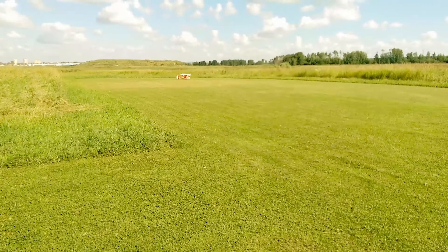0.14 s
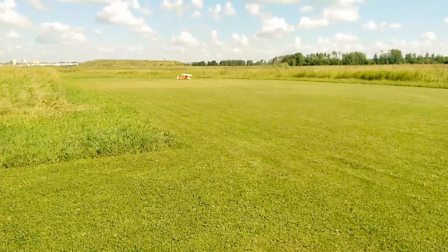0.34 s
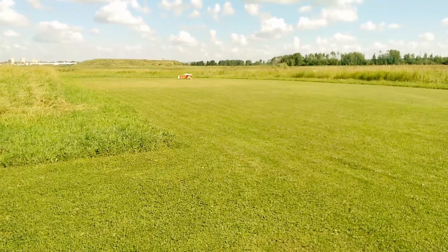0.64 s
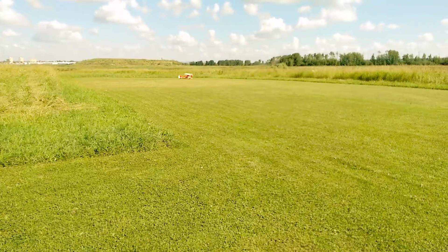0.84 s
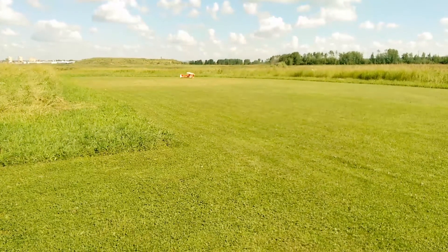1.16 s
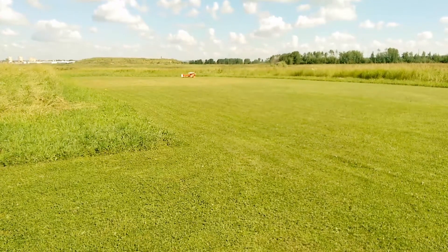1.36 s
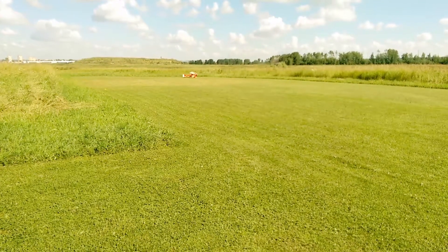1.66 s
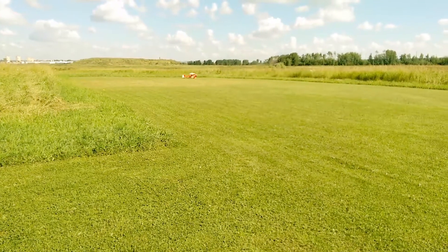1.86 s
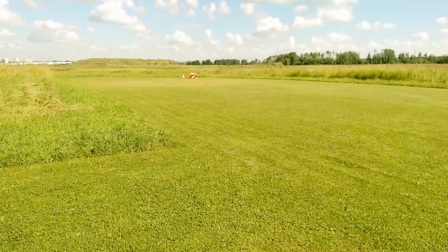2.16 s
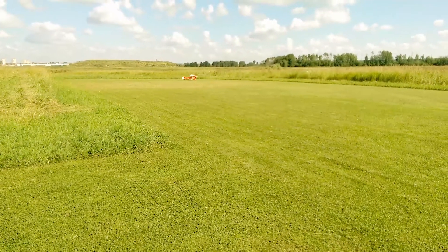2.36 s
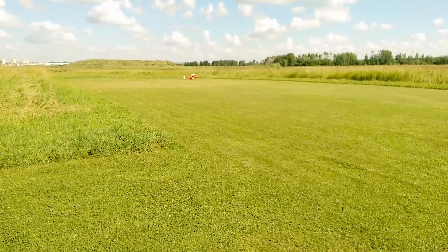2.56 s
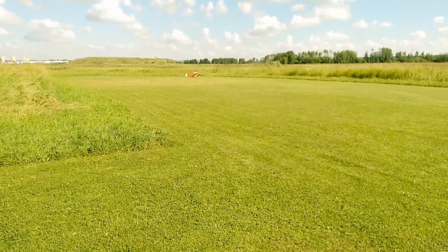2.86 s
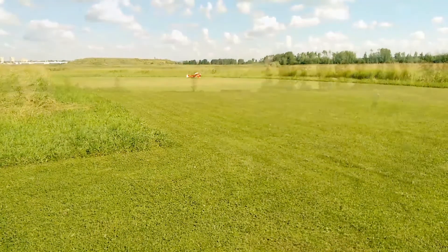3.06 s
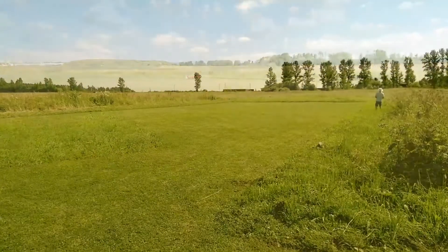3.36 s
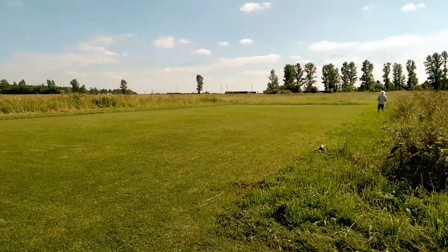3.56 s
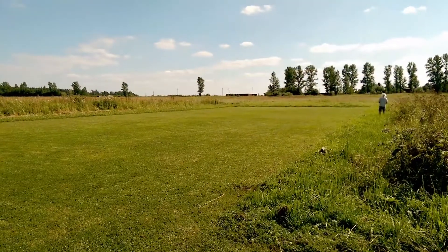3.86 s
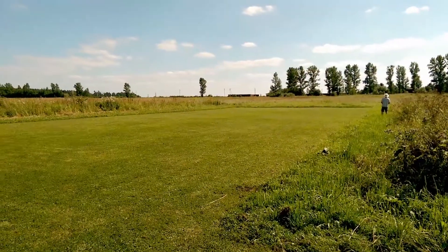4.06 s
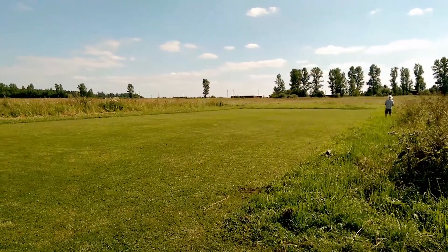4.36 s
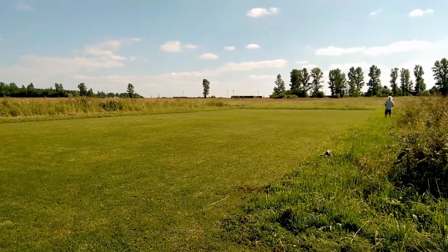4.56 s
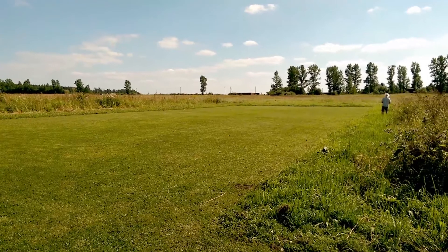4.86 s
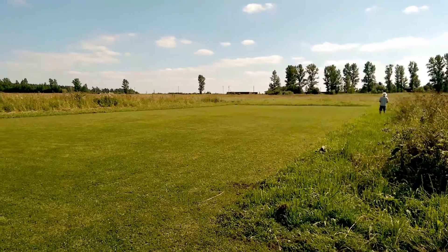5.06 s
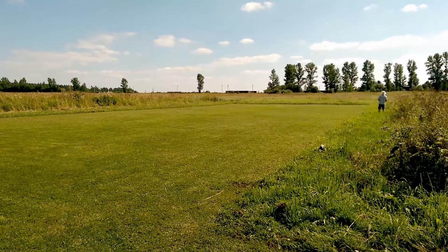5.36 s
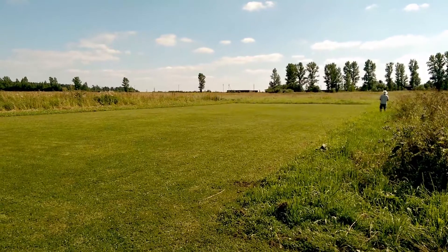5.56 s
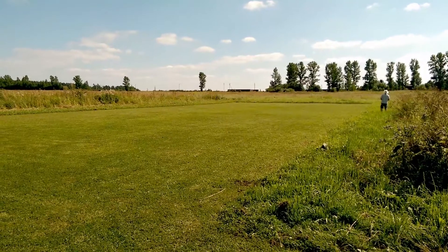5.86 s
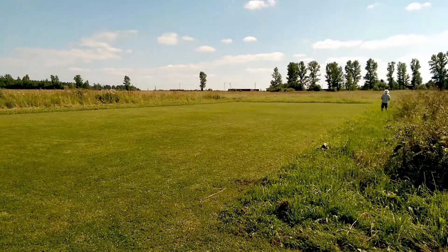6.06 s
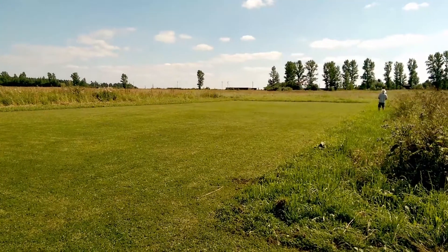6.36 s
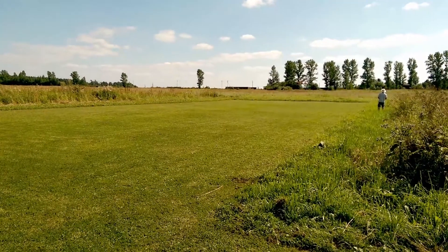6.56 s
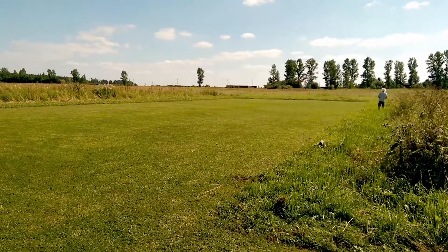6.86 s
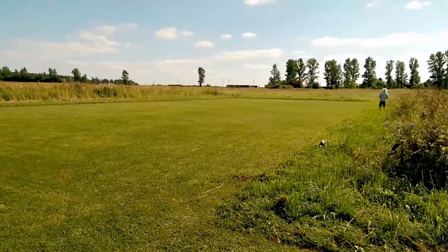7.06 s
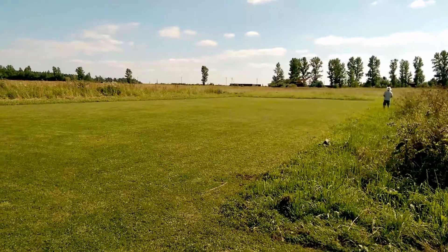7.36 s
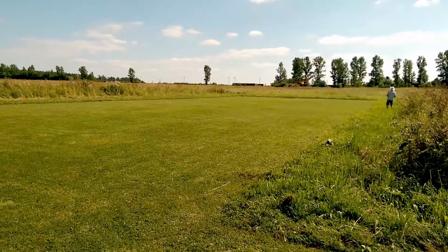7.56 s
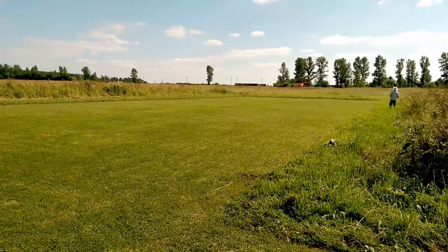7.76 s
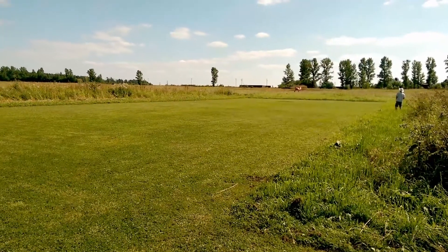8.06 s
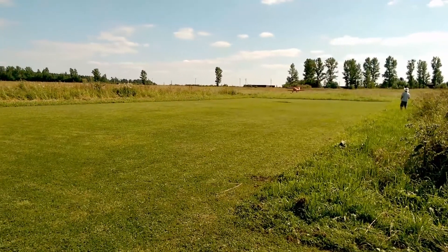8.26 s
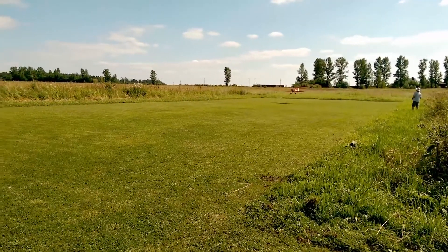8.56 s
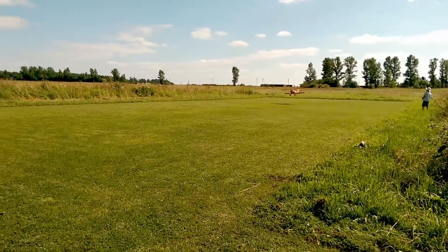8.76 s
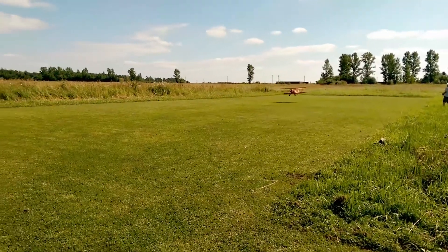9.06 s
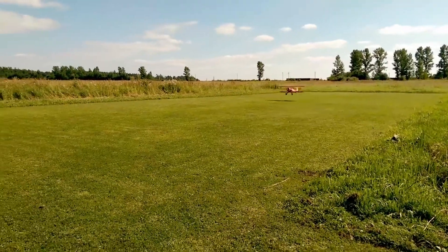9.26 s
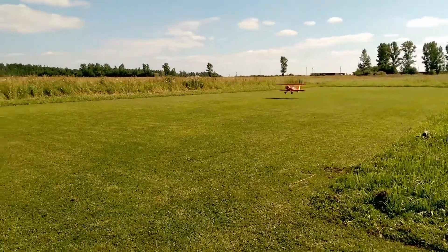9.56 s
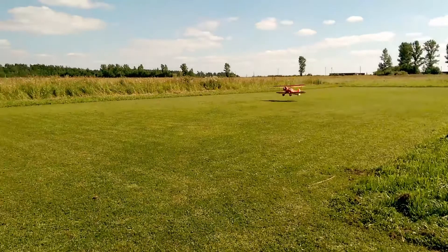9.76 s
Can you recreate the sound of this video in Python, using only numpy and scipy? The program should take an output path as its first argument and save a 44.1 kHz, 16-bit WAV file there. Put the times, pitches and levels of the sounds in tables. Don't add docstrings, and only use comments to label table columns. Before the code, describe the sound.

On an open grass field, a large model plane's multi-cylinder four-stroke engine taxis far away, dull, boomy and uneven, with low wind knocks on the right. Around three seconds it blends into a nearer view: raspy throttle bursts with metallic cracks, a high peak after six seconds, then a slow lumpy idle growing louder as it rolls up. Grasshoppers rasp faintly; open stereo microphones hiss.

```python
import sys
import numpy as np
from scipy import signal
from scipy.fft import rfft, irfft
from scipy.io import wavfile
from scipy.ndimage import uniform_filter1d

SR = 44100
rng = np.random.default_rng(int(sys.argv[2]) if len(sys.argv) > 2 else 0)


def inscribe(sig):
    pcm = np.round(np.clip(np.atleast_2d(sig).T, -1, 1) * 32767)
    wavfile.write(sys.argv[1], SR, pcm.astype(np.int16))


def ratio_of_db(decibels):
    return 10 ** (np.asarray(decibels, float) / 20)


N = 437472


def evened(x):
    return x / np.sqrt(np.mean(x ** 2) + 1e-20)


def read(points, hz):
    f, value = np.transpose(points)
    return np.interp(np.log(hz + 1), np.log(f + 1), value)


def shape(x, response):
    return irfft(rfft(x) * response(np.fft.rfftfreq(x.shape[-1], 1 / SR)), x.shape[-1])


def peaks(modes, hz):
    return np.sqrt(sum(ratio_of_db(db) ** 2 / (1 + (2 * (hz - f) / w) ** 2) ** 2 for f, w, db in modes))


def resonant_noise(modes, same):
    a, b = rng.standard_normal((2, N))
    ports = np.array([a, same * a + np.sqrt(1 - same ** 2) * b])
    return evened(shape(ports, lambda hz: peaks(modes, hz)))


def causal(response, size=4096):
    log_gain = np.log(response(abs(np.fft.fftfreq(size, 1 / SR))))
    ring = np.fft.ifft(np.exp(np.conj(signal.hilbert(log_gain)))).real
    return ring / np.linalg.norm(ring)


def blows(at, size, ring):
    return signal.oaconvolve(np.bincount(at, size, N)[:N], ring)[:N]


def bursts(at, size, decay_s):
    n = np.arange(1500)
    fall = np.exp(-n / (decay_s * SR)) * np.minimum(n / 45, 1)
    return blows(at, size, fall / np.linalg.norm(fall))


# [f/Hz, level/dB per Hz]
HISS_COLOUR = [(250, -47), (450, -3), (600, -1.5), (1140, -9.5), (3000, -16), (4500, -18), (5600, -12.5),
               (6440, -19.5), (7750, -8), (10400, -12.5), (12500, -3.5), (14100, 0.5), (15800, 0)]
# [f/Hz, level/dB]
HISS_TILT = [(400, -2), (4000, -1), (8000, -5), (12000, -13), (16000, -13)]


def hiss():
    ports = lambda hz: ratio_of_db(read(HISS_COLOUR, hz) + np.outer([.5, -.5], read(HISS_TILT, hz)))
    return ratio_of_db(-47) * evened(shape(rng.standard_normal((2, N)), ports))


# [t/s, level/dB, left minus right/dB]
WIND = [(0.0, -50.5, -14), (0.88, -53.5, -6), (1.68, -49.5, -8), (2.042, -47, -8), (2.43, -53.5, -7.5),
        (2.82, -48.5, -10), (3.12, -50.5, 1), (3.42, -53.5, -8), (4.34, -63, 0), (9.28, -56.5, -1.5),
        (9.92, -53, -2)]
# [f/Hz, level/dB per Hz]
RUMBLE = [(12, -51), (20, 3.5), (50, 1), (76, -7.5), (125, -11), (162, -13.5), (236, -3.5), (336, -28),
          (400, -29), (520, -76), (880, -120)]
# [t/s, peak level/dB, swing f/Hz, top of the rustle f/Hz]
KNOCKS = [(0.0, -20, 112, 310), (0.012, -26.5, 75, 195.6), (0.039, -26.5, 91.7, 220),
          (0.239, -31.5, 119, 201.2), (0.288, -23, 92, 320), (0.301, -25, 90, 260), (0.317, -35, 110, 200),
          (0.406, -33, 103, 200), (0.564, -31, 130, 205), (0.751, -32, 75, 200), (1.229, -35, 68.1, 202),
          (1.579, -37.5, 72.7, 202), (1.973, -27, 154.7, 566), (1.985, -26, 74.4, 300),
          (2.029, -27.5, 152, 332), (2.078, -29.5, 147, 200), (2.761, -39, 188, 198.4),
          (2.798, -36, 66.65, 200), (3.401, -38, 62.3, 200), (3.559, -41, 96, 201)]


def wind():
    rumble = evened(shape(rng.standard_normal((3, N)), lambda hz: ratio_of_db(read(RUMBLE, hz))))
    lumps = evened(shape(rng.standard_normal((2, N)), lambda hz: hz < 12))
    s, *columns = np.transpose(WIND)
    level_db, pan_db = (np.interp(np.arange(N) / SR, s, c) for c in columns)
    port_db = 1.6 * lumps + level_db + np.outer([.5, -.5], pan_db)
    out = (rumble[:2] + 1.69 * rumble[2]) * ratio_of_db(port_db)
    t = np.arange(3000) / SR
    for s, db, hz, top_hz in KNOCKS:
        rustle = evened(shape(rng.standard_normal(3000), lambda f: 1 / (1 + (f / top_hz) ** 6)))
        swing = -np.sin(2 * np.pi * hz * t) + 0.5 * rustle
        knock = ratio_of_db(db + 6.0) * swing * np.minimum(t / 0.0016, 1) * np.exp(-(t / 0.013) ** 2)
        part = out[1, round(s * SR):][:3000]
        part += signal.lfilter(*signal.butter(3, 2.5 * top_hz, fs=SR), knock)[:len(part)]
    return shape(out, lambda hz: 1 / (1 + (42 / (hz + 1)) ** 3))


# (t/s, f/Hz, level/dB, half length/s)
CHIRP = (3.055, 3250, -52, .006)


def bird():
    s, hz, db, half_s = CHIRP
    t = np.arange(N) / SR - s
    return ratio_of_db(db) * np.exp(-(t / half_s) ** 2) * np.sin(2 * np.pi * hz * t)


# [start t/s, end t/s, f/Hz, left level/dB, right level/dB]
GRASSHOPPERS = [
    (4.352, 5.579, 8930, -58, -57),
    (5.551, 7.118, 7835, -72, -53.5),
    (7.303, 9.009, 7752, -56, -53.5),
    (8.749, 9.95, 9530, -56.5, -52.5),
]
# [strokes per s, share chopped 0-1]
STROKES = [(51.5, .6), (54.3, .78), (53.6, .65), (48, .4)]


def grasshoppers():
    t, out = np.arange(N) / SR, np.zeros((2, N))
    sharpness, tiring_per_s, swell_s = 2.2, .02, .3
    for (start, end, hz, left_db, right_db), (per_s, depth) in zip(GRASSHOPPERS, STROKES):
        gate = np.clip(np.minimum((t - start) / swell_s, (end - t) / 0.011), 0, 1)
        beat = np.cos(2 * np.pi * per_s * (t - start) * (1 - tiring_per_s * (t - start)))
        scrape = 1 - depth + 1.82 * depth * np.exp(sharpness * (beat - 1))
        rasp = resonant_noise([(hz, 0.16 * hz, 0)], 0.5)
        out += rasp * gate * scrape * ratio_of_db(np.array([[left_db], [right_db]]))
    return out


# [f/Hz, width/Hz, level/dB]
VALVE = [(11300, 550, 1), (8500, 880, -5), (3900, 600, -17)]


def valve_gear(rate, hiss_db, valve, rockers):
    strong_s, over_hiss_db = valve
    crank = np.cumsum(rate) / SR
    rocker = (crank - crank[round(strong_s * SR)]) * 2 / 3
    shut = np.flatnonzero(np.diff(np.floor(rocker)) > 0)
    weak_db = -20 * (np.floor(rocker[shut + 1]) % 2)
    chance_db = 2 * np.clip(rng.standard_normal(len(shut)), -2, 1.5)
    tick_db = over_hiss_db + hiss_db[shut] + weak_db + chance_db
    taps = np.bincount(shut, np.sqrt(SR / rate[shut]) * ratio_of_db(tick_db - 9), N)
    for s, db in rockers:
        taps[round(s * SR)] += ratio_of_db(db + 13.0)
    return signal.oaconvolve(taps, causal(lambda hz: peaks(VALVE, hz)))[:N]


def propeller(rate, turns, at, crack, hiss_db, modes, alike):
    blade = np.flatnonzero(np.diff(np.floor(turns * 4 / 3)) > 0)
    chance_db = 3.5 * np.clip(rng.standard_normal(len(blade)), -2, 2)
    slap = np.sqrt(SR / rate[blade]) * ratio_of_db(chance_db)
    swish = bursts(blade, 0.24 * slap, 0.0051) + bursts(at, 0.32 * crack, 0.0035) + 0.6
    return resonant_noise(modes, alike) * swish * ratio_of_db(hiss_db)


def intake(at, spacing, strength_db, howl_db, modes):
    gasps = bursts(at, 0.64 * spacing * ratio_of_db(strength_db), 0.0019) + .5
    howl = resonant_noise(modes, 1.0) * gasps * ratio_of_db(howl_db)
    sing = spacing * ratio_of_db(strength_db + howl_db[at] - 11)
    return howl + blows(at, sing, causal(lambda hz: peaks(modes, hz)))


# [f/Hz, width/Hz, level/dB]
CRACK = [(1345, 187, 0), (1614, 360, 1.5), (2112, 147, 10), (2800, 510, 0.5), (3250, 130, -5.5),
         (4900, 700, -17)]


def clatter(rate, at, crack, clatter_db, modes, steady, pull):
    puffs = bursts(at, 0.39 * crack * ratio_of_db(-12 * pull[at]), 0.0062)
    gear = resonant_noise(modes, 0.86) * (puffs + steady * ratio_of_db(clatter_db - 7 * pull))
    fast = np.clip((rate[at] - 70) / 40, 0, 1)
    for scale, share in ((1, 1 - fast), (1.026, fast)):
        ring = causal(lambda hz: peaks(CRACK, hz / scale))
        ring = ring * np.minimum(np.arange(len(ring)) / (.0014 * SR), 1)
        gear += blows(at, np.sqrt(share) * crack * (0.11 + 0.7 * pull[at]), ring)
    return gear


def drone(rate, colour, between_db, upper_db, pulls):
    step = 64
    cycle = np.cumsum(rate) / SR / 3
    slow = rate[::step]
    slowing = -uniform_filter1d(np.gradient(slow), size=60) * SR / step
    lowest, rest = np.clip(slowing / 65, 0, 1) ** 2, np.clip(slowing / 150, 0, 1) ** 2
    full_db = -8 * np.clip((slow - 120) / 15, 0, 1)
    waver = evened(uniform_filter1d(rng.standard_normal((24, len(slow))), 40, axis=1))
    out = np.zeros(N)
    for k, (wobble, start) in enumerate(zip(waver, 0.62 * rng.random(24)), 1):
        db = read(colour, k * slow / 3) + 1.1 * wobble
        if k % 3 > 0:
            db += (upper_db if pulls and k in range(11, 18) else between_db)[::step] + full_db
        db += pulls * (7.3 * lowest if k == 3 else -4.0 * rest)
        level = np.interp(np.arange(N) / step, np.arange(len(db)), ratio_of_db(db))
        out += level * np.cos(2 * np.pi * (k * cycle + start))
    return out


def exhaust_pipe(rate, throttle, fired, thump, drone_db, exhaust, even, between_db, misfires, pulls):
    t = np.arange(N) / SR
    pipe = blows(fired, thump, causal(lambda hz: ratio_of_db(read(exhaust, hz))))
    gaining_db = 5 * pulls * np.clip(np.gradient(rate) * SR / 85, 0, 1)
    orders = drone(rate, even, between_db * (0.5 + throttle), -11 * (1.05 - throttle), pulls)
    pipe += ratio_of_db(drone_db + gaining_db) * orders
    for s, db in misfires:
        pipe = pipe * ratio_of_db(db * np.exp(-((t - s) / 0.011) ** 2))
    return pipe


def drifting_crank(rate, pops):
    turns = np.cumsum(rate) / SR
    t = np.arange(N) / SR
    pop_s, _, thump_db = np.transpose(sorted(pops))
    slip, slips = 0, []
    for turn, stride in zip(np.interp(pop_s, t, turns), np.where(thump_db > -98, 1, 3)):
        slip = stride * np.round((turn + slip) / stride) - turn
        slips.append(slip)
    return np.maximum.accumulate(turns + np.interp(t, pop_s, slips))


REVVING_DB = [2, -7, 4.5]


def firings(rate, turns, pull, exhaust_db, clatter_db, cylinders, uneven_db, pops):
    at = np.flatnonzero(np.diff(np.floor(turns)) > 0)
    stroke = np.floor(turns[at + 1]).astype(int)
    thump_db, crack_db = np.array(cylinders, float)[stroke % len(cylinders)].T
    crack_db = crack_db + pull[at] * (np.array(REVVING_DB)[stroke % len(REVVING_DB)] - crack_db)
    chance = np.minimum(rng.standard_normal((2, len(at))), .4)
    chance = uneven_db * chance * (1 - .45 * pull[at])
    spacing = np.sqrt(SR / rate[at])
    thump = spacing * ratio_of_db(exhaust_db[at] - 5.5 * pull[at] + thump_db + chance[0])
    crack = spacing * ratio_of_db(clatter_db[at] + crack_db + .7 * (chance[0] + chance[1]))
    pop_s, pop_crack_db, pop_thump_db = np.transpose(sorted(pops))
    hard = abs(at[:, None] - pop_s * SR).argmin(axis=0)
    thump[hard] = np.where(pop_thump_db > -98, np.sqrt(SR) * ratio_of_db(pop_thump_db), thump[hard])
    crack[hard] = np.where(pop_crack_db > -98, np.sqrt(SR) * ratio_of_db(pop_crack_db), crack[hard])
    return at, thump, crack, crack_db


def engine(speed, near, layers, pops, ticks, misfires, rockers, ground, valve, alike, cylinders, exhaust,
           even, rattle, howl, blades, lead, tilt, steady, uneven_db, between_db, pulls):
    t = np.arange(N) / SR
    s, *columns = np.transpose(speed)
    rate, throttle = (uniform_filter1d(np.interp(t, s, c), size=2000) for c in columns)
    controls = [np.ones(N), np.log2(rate / 80), throttle, np.interp(t, *np.transpose(near))]
    exhaust_db, clatter_db, howl_db, hiss_db, drone_db = np.array(layers) @ controls
    change = np.gradient(rate) * SR
    ahead = np.minimum(rate + .07 * np.maximum(change, 0), rate.max())
    howl_db = howl_db + 70 * np.maximum(np.log2(ahead / 118), 0)
    clatter_db = clatter_db - 0.5 * np.clip(-change / 176, 0, 1) ** 2
    pull = pulls * np.clip((rate - 62) / 23, 0, 1)
    turns = drifting_crank(rate, pops)
    fired, thump, crack, strength_db = firings(
        rate, turns, pull, exhaust_db, clatter_db, cylinders, uneven_db, pops)
    spacing, at = np.sqrt(SR / rate[fired]), fired.copy()
    for s, db in ticks:
        k = abs(at - s * SR).argmin()
        at[k], crack[k] = round(s * SR), np.sqrt(SR) * ratio_of_db(db)
    pipe = exhaust_pipe(rate, throttle, fired, thump, drone_db, exhaust, even, between_db, misfires, pulls)
    gear = clatter(rate, at, crack, clatter_db, rattle, steady, pull)
    throat = intake(at, spacing, strength_db, howl_db, howl)
    air = propeller(rate, turns, at, crack / ratio_of_db(clatter_db[at]), hiss_db, blades, alike)
    sound = pipe + gear + throat + air + valve_gear(rate, hiss_db, valve, rockers)
    dip_hz, dip_width, dip_db = ground

    def path(hz):
        level = ratio_of_db(np.outer([.5, -.5], read(tilt, hz)))
        phase = np.exp(1j * np.outer([1, 0], np.interp(hz, *np.transpose(lead))))
        bounce = ratio_of_db(dip_db * np.exp(-(2 * (hz - dip_hz) / dip_width) ** 2))
        return level * phase * bounce
    return shape(sound, path)


# [t/s, firings per s, throttle 0-1]
TAXI_SPEED = [(0, 52, 0.3), (.55, 55.2, .5), (.8, 57.4, 0.67), (1.05, 62, 0.57), (1.3, 68.3, 0.34),
              (1.5, 70.8, 0.38), (1.8, 74, 0.72), (2.15, 76.3, 0.69), (2.56, 81.2, 0.8), (3.1, 78.7, 0.97),
              (3.7, 81, 0.95)]
# [t/s, nearness 0-1]
TAXI_NEAR = [
    (0.101, 0.04),
    (1.2, 0.82),
    (2.102, 0.87),
    (3.0, 0.68),
    (3.6, 0.75),
]
# [at cruise/dB, per octave of speed/dB, at full throttle/dB, when nearest/dB]
TAXI_LAYERS = [
    (-61.5, 2, -2.5, 6.5),
    (-72.5, 5.5, 4, 10.5),
    (-71, 2, 0, -1.5),
    (-82, -8.5, 0.4, 32),
    (-45.5, 10, 8, 1.1),
]
# [t/s, exhaust peak level/dB]
TAXI_POPS = [(0.585, -26), (1.061, -37), (1.182, -34), (1.256, -26), (1.343, -25.5), (1.43, -33),
             (1.516, -27), (1.603, -49), (1.674, -32), (1.763, -40), (1.845, -44), (1.925, -34),
             (1.972, -46), (2.08, -43), (2.382, -30), (2.459, -36), (2.829, -28), (2.902, -38),
             (2.988, -53), (3.051, -59)]
# [t/s, change of the pipe level/dB]
MISFIRES = [(.438, -18), (.571, -16), (.689, -6), (.775, -10), (.87, -8), (.965, -11), (1.049, 2),
            (1.171, -8), (1.228, -4), (1.33, -5), (1.405, -11), (1.482, -3), (1.59, -18), (1.665, -14),
            (1.735, -16), (1.826, -7), (1.905, -6), (1.991, -11), (2.22, -8), (2.293, -4), (2.374, -6),
            (2.449, -10), (2.635, -5), (2.73, -6), (2.82, -11), (2.895, -9.5), (2.975, -0.5), (3.06, 3),
            (3.15, 2.5), (3.239, -4)]
# [t/s, peak level/dB]
ROCKERS = [(0.8988, -46), (0.9478, -46), (0.998, -46), (1.045, -39), (1.0924, -34), (1.1356, -41),
           (1.1806, -42), (1.2465, -45), (1.3129, -36), (1.3563, -37), (1.3992, -41), (1.4436, -39),
           (1.486, -43), (1.53, -41), (1.657, -48), (1.7783, -39), (1.8577, -38), (1.9368, -36),
           (1.9752, -42), (2.0547, -41), (2.0941, -40), (2.1335, -42), (2.2506, -42), (2.3271, -45),
           (2.366, -42), (2.4044, -36), (2.4408, -44), (2.4787, -42), (2.517, -37), (2.59, -47)]
# (f/Hz, width/Hz, level/dB)
TAXI_DIP = (4500, 400, -3)
# (t/s of a strong tick that sets the timing of all, level over the blade hiss/dB)
TAXI_VALVE = (1.181, 4)
# [exhaust level/dB, clatter level/dB]
TAXI_CYLINDERS = [(-44, 5.5), (0, -8), (14.5, 5), (10.5, -2.5), (-33, -21), (-40, -27)]
# [f/Hz, level/dB per Hz]
TAXI_EXHAUST = [(41, -35), (70, -9), (118, -22), (167, 1), (227, -5.5), (272, -3), (312, -27.5), (396, -27),
                (495, -21), (594, -73), (700, -43), (910, -63), (1540, -120)]
# [f/Hz, level of an order/dB]
TAXI_DRONE = [(60, -51), (100, -14), (160, -4.5), (240, 3.5), (290, -11.5), (340, -30), (400, -26),
              (480, -26), (700, -63)]
# [f/Hz, width/Hz, level/dB]
TAXI_CLATTER = [(1725, 470, 8), (2780, 1700, 7), (4120, 460, 10), (4970, 340, 6)]
TAXI_HOWL = [(480, 150, 0), (800, 300, -12)]
TAXI_BLADES = [(8350, 3250, -0.23), (11800, 3000, -1.3)]
# [f/Hz, phase/radians]
TAXI_LEAD = [(300, .1), (1000, .8), (2760, 3.8), (4300, 9.2), (6900, 15.5), (11000, 24.2), (12600, 29.2),
             (15800, 38.3)]
# [f/Hz, level/dB]
TAXI_TILT = [(60, -6), (150, -6), (380, -2), (950, -7.5), (2380, -0.5), (5980, 0.5), (15000, -15)]


def taxiing_engine():
    booms = [(s, -99, db - 31.5) for s, db in TAXI_POPS]
    return engine(TAXI_SPEED, TAXI_NEAR, TAXI_LAYERS, booms, [], MISFIRES, ROCKERS, TAXI_DIP, TAXI_VALVE,
                  0.47, TAXI_CYLINDERS, TAXI_EXHAUST, TAXI_DRONE, TAXI_CLATTER, TAXI_HOWL, TAXI_BLADES,
                  TAXI_LEAD, TAXI_TILT, steady=1.1, uneven_db=1.5, between_db=-12, pulls=0)


# [t/s, firings per s, throttle 0-1]
CLOSE_SPEED = [(3.05, 94.93, 0.62), (3.38, 115.7, 0.96), (3.94, 94.9, 0.37), (4.2, 68.23, 0.086),
               (4.44, 77.83, 0.27), (4.6, 107, 0.64), (4.86, 88.2, 0.25), (4.98, 101.7, 0.67),
               (5.09, 92.4, 0.41), (5.2, 97.7, 0.52), (5.47, 79.03, 0.35), (5.87, 68.3, 0.2),
               (5.99, 90.2, 0.61), (6.27, 143.3, 0.98), (6.51, 91.6, 0.6), (6.87, 65.8, 0.22),
               (7.12, 55.7, 0.21), (9.92, 53.6, 0.12)]
# [t/s, nearness 0-1]
CLOSE_NEAR = [
    (7.0, .01),
    (7.8, 0.28),
    (9.92, 0.81),
]
# [at cruise/dB, per octave of speed/dB, at full throttle/dB, when nearest/dB]
CLOSE_LAYERS = [
    (-60.5, -1.5, 9, 18),
    (-53.5, -0.5, 13.2, 7),
    (-66, -7, 11, .1),
    (-66.5, -7, 16.4, 19.3),
    (-64.5, 7.5, 12, 9),
]
# [t/s, crack peak level/dB]
REVVING_POPS = [(3.404, -28), (3.4818, -25.5), (3.587, -27.5), (3.6972, -28.5), (3.7266, -30.5),
                (3.7825, -28), (3.8426, -30.5), (3.9359, -33), (4.4757, -33.5), (4.542, -31.5),
                (4.656, -32.5), (4.715, -31.5), (4.775, -32.5), (4.873, -35), (4.9075, -33), (4.97, -32),
                (5.0943, -31.5), (5.1262, -31.5), (5.1558, -30.5), (5.219, -27), (5.315, -34),
                (5.608, -33.5), (5.9012, -33), (5.976, -29.5), (6.008, -29.5), (6.07, -28), (6.099, -27),
                (6.2238, -28), (6.268, -23.5), (6.6, -38.5)]
# [t/s, exhaust peak level/dB]
IDLE_POPS = [(6.97, -48), (7.023, -42), (7.058, -44), (7.181, -42), (7.216, -42), (7.326, -39.5),
             (7.427, -45), (7.539, -40.5), (7.606, -52), (7.644, -40.5), (7.716, -43), (7.752, -40),
             (7.825, -44), (7.863, -39), (7.937, -38), (7.973, -40), (8.027, -44), (8.082, -39),
             (8.155, -36.5), (8.191, -39), (8.302, -36), (8.403, -39), (8.474, -35), (8.529, -49),
             (8.567, -39), (8.605, -45), (8.642, -35), (8.68, -35.5), (8.776, -41), (8.797, -34),
             (8.865, -45), (8.903, -35), (8.943, -35), (9.033, -31), (9.071, -37), (9.128, -32.5),
             (9.165, -36.5), (9.205, -31), (9.299, -30.5), (9.336, -33), (9.373, -30), (9.411, -31),
             (9.449, -42), (9.487, -33.5), (9.526, -32), (9.565, -42), (9.606, -28.5), (9.644, -29),
             (9.718, -30), (9.778, -27.5), (9.817, -30.5), (9.855, -30.5)]
# (t/s, exhaust peak level/dB)
LAST_POP = (9.894, -29)
# [t/s, crack peak level/dB]
CLOSE_TICKS = [(2.9856, -48.5), (3.037, -50), (3.0789, -47), (3.1004, -46), (3.1438, -42), (3.1754, -52),
               (3.207, -39.5), (3.2562, -37), (3.2954, -35.5), (3.3237, -40), (3.3516, -32), (3.379, -32),
               (3.4296, -31.5), (3.455, -33), (3.507, -40), (3.5344, -33), (3.5605, -31), (3.614, -37),
               (3.6323, -35), (3.6414, -31), (3.7447, -36), (3.754, -33), (3.774, -37), (3.803, -40),
               (3.8332, -38), (3.8928, -38), (3.9575, -37), (4.4374, -39.5), (4.4631, -43), (4.5101, -37),
               (4.572, -34), (4.5995, -32), (4.736, -47), (4.7967, -39), (4.9408, -36), (4.9911, -32),
               (5.021, -40), (5.2402, -39), (5.2714, -40), (5.3043, -37), (5.9143, -32), (5.9403, -36),
               (5.9643, -38), (5.988, -34), (6.0311, -38), (6.04, -32), (6.08, -32), (6.1167, -32),
               (6.136, -27.5), (6.1529, -27), (6.177, -26.5), (6.2013, -28), (6.2096, -26.5),
               (6.2314, -23), (6.2454, -27.5), (6.2896, -26.5), (6.3259, -36), (6.35, -34), (6.6604, -37),
               (6.6732, -32.5),
               (7.0238, -37.5), (7.1818, -33), (7.3414, -33), (7.556, -36), (7.6083, -45), (7.6624, -39),
              (7.7909, -46), (7.992, -39), (8.157, -30), (8.191, -38), (8.3172, -35), (8.4754, -33),
              (8.5297, -45), (8.644, -36), (8.8141, -37.5), (8.9009, -42), (8.958, -37), (9.0338, -30.5),
              (9.091, -39), (9.1285, -39), (9.1683, -41), (9.2057, -32), (9.3, -33.5), (9.3718, -34.5),
              (9.527, -42), (9.6082, -30.5), (9.7385, -40), (9.7795, -35), (9.8173, -38), (9.8943, -32.5)]
# (f/Hz, width/Hz, level/dB)
CLOSE_GROUND = (3800, 600, -9)
# (t/s of a strong tick that sets the timing of all, level over the blade hiss/dB)
CLOSE_VALVE = (9.034, -10)
# [exhaust level/dB, clatter level/dB]
CLOSE_CYLINDERS = [(-1, -5), (-20, -4.5), (-11, -36), (-1, -8.5), (1, -4.5), (6, 1)]
# [f/Hz, level/dB per Hz]
CLOSE_EXHAUST = [(41, -43.5), (70, -33), (124, -9), (148, -4), (229, 5), (259, 4.5), (353, -70), (393, -40),
                 (441, -23), (583, -30.5), (700, -22.5), (910, -53), (1540, -120)]
# [f/Hz, level of an order/dB]
CLOSE_DRONE = [(60, -15), (105, -7), (135, -5), (210, 1), (285, 2.5), (390, -16), (470, -11), (600, -11),
               (680, -24)]
# [f/Hz, width/Hz, level/dB]
CLOSE_CLATTER = [(1160, 160, -5.5), (1610, 290, -6), (2010, 260, -1.5), (2528, 480, -4.5), (2980, 150, -15),
                 (4720, 700, -19.5)]
CLOSE_HOWL = [(975, 120, 0), (815, 90, -10), (650, 250, -24)]
CLOSE_BLADES = [(7980, 570, 2.5), (8730, 3270, -1), (6340, 940, -5), (3320, 2140, 2.5), (5040, 1100, -26)]
# [f/Hz, phase/radians]
CLOSE_LEAD = [(1550, 0), (2840, 1.5), (4400, -1.5), (5500, -1), (7000, 3), (9650, 4.3), (11700, 9.9),
              (15800, 17)]
# [f/Hz, level/dB]
CLOSE_TILT = [(60, -4), (150, -3.5), (380, -3), (950, -2.5), (2380, -3.5), (5980, 10.5), (15000, -26)]


def closer_engine(fade_in):
    cracks = [(s, db - 25.0, -99) for s, db in REVVING_POPS]
    chugs = [(s, -99, db - 22.5) for s, db in IDLE_POPS + [LAST_POP]]
    ticks = [(s, db - 25.5 - 20 * np.log10(fade_in[round(s * SR)])) for s, db in CLOSE_TICKS]
    return engine(CLOSE_SPEED, CLOSE_NEAR, CLOSE_LAYERS, cracks + chugs, ticks, [], [], CLOSE_GROUND,
                  CLOSE_VALVE, 0.45, CLOSE_CYLINDERS, CLOSE_EXHAUST, CLOSE_DRONE, CLOSE_CLATTER, CLOSE_HOWL,
                  CLOSE_BLADES, CLOSE_LEAD, CLOSE_TILT, steady=0.76, uneven_db=5.0, between_db=-6.0, pulls=0.66)


# [t/s, share of the closer place 0-1]
FADE = [
    (2.9, 0.0051),
    (3.951, 0.84),
]


def scene():
    closer = np.clip(np.interp(np.arange(N) / SR, *np.transpose(FADE)), 0, 1)
    fade_in, fade_out = closer ** 0.7, (1 - closer) ** 1.72
    field = hiss() + wind() + bird() + grasshoppers()
    return field + taxiing_engine() * fade_out + closer_engine(fade_in) * fade_in


def low_pass(x):
    return signal.sosfilt(signal.butter(12, 16250, fs=SR, output="sos"), x)


def record(dry):
    mix = shape(dry, lambda hz: hz < 15870)
    return low_pass(mix)


dry = scene()
out = record(dry)
inscribe(out)
```